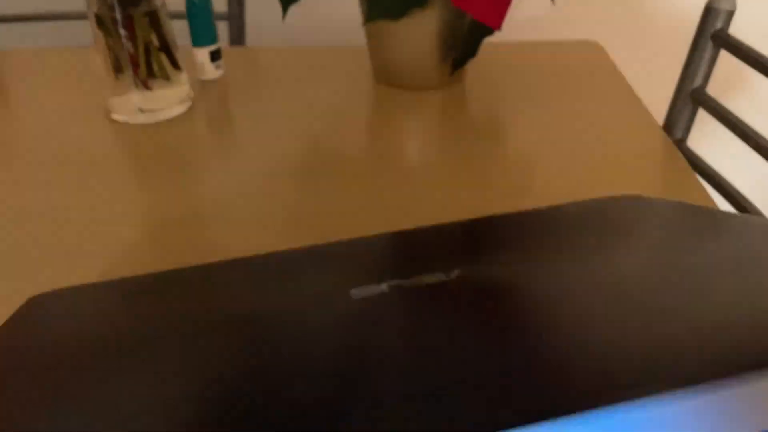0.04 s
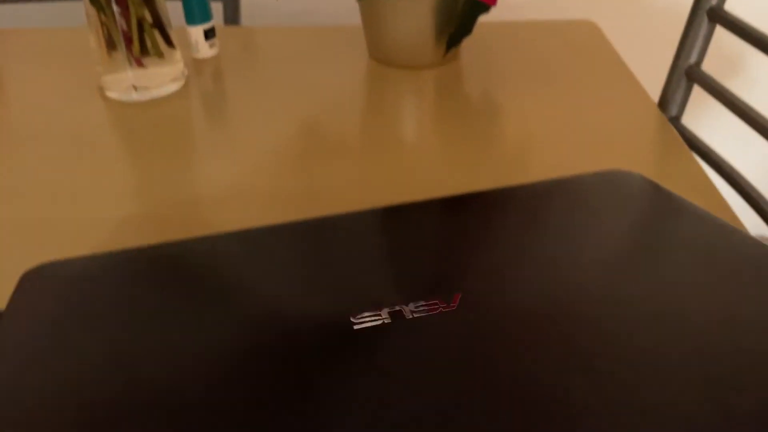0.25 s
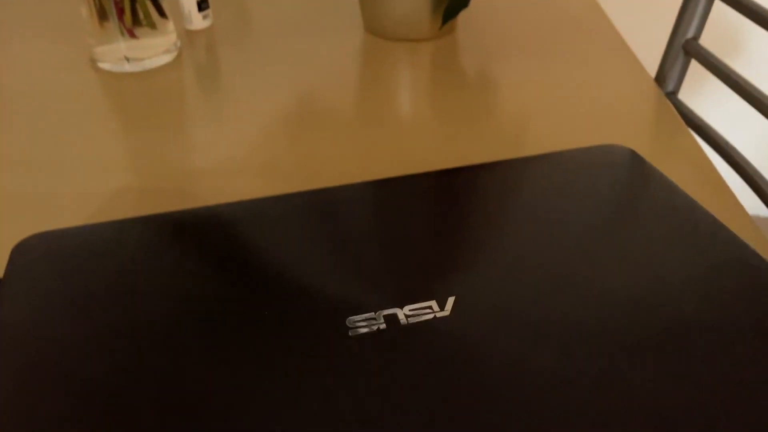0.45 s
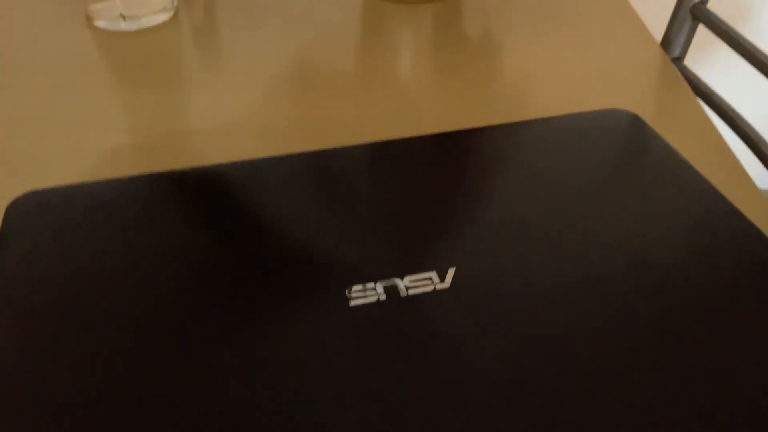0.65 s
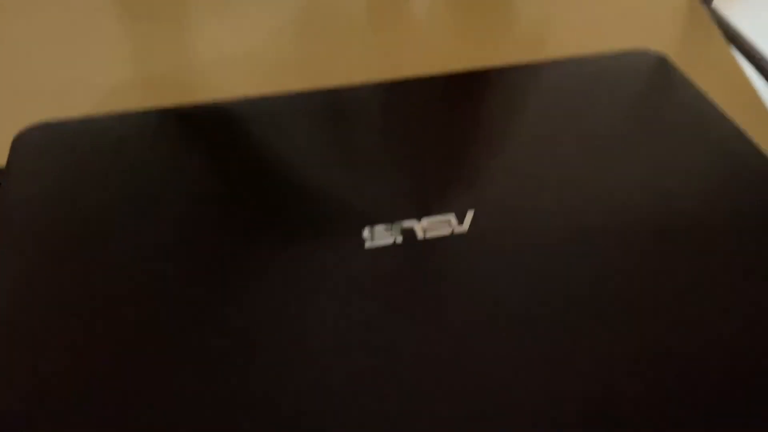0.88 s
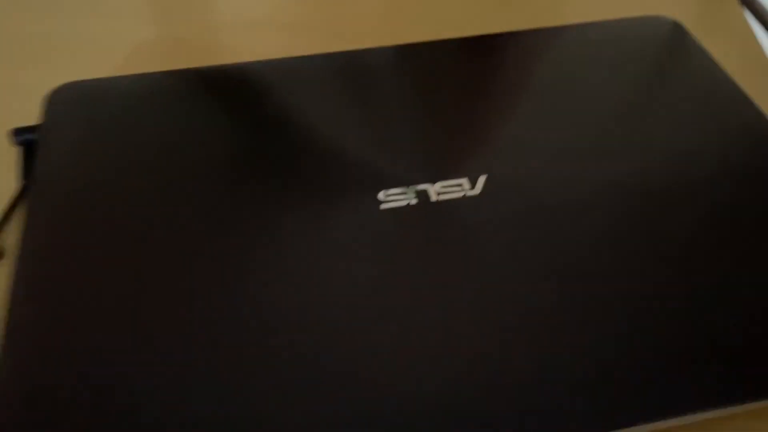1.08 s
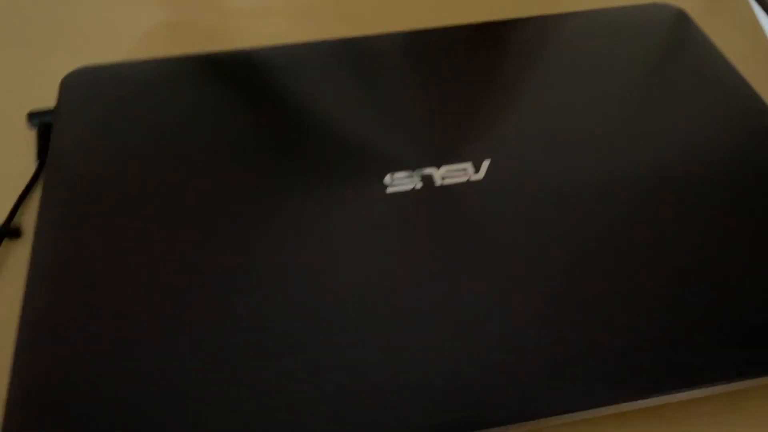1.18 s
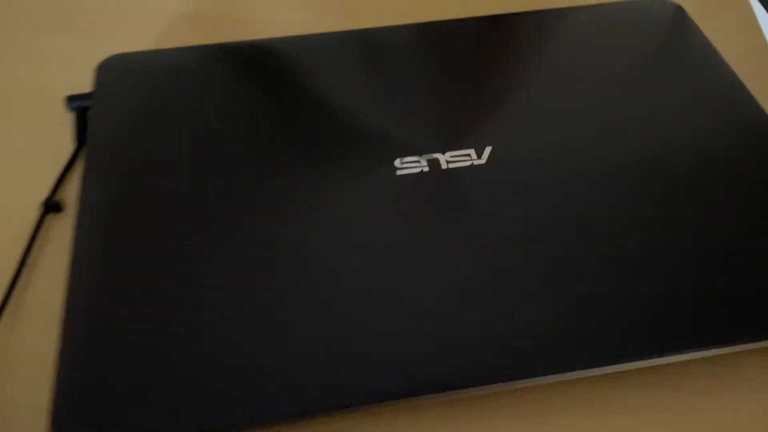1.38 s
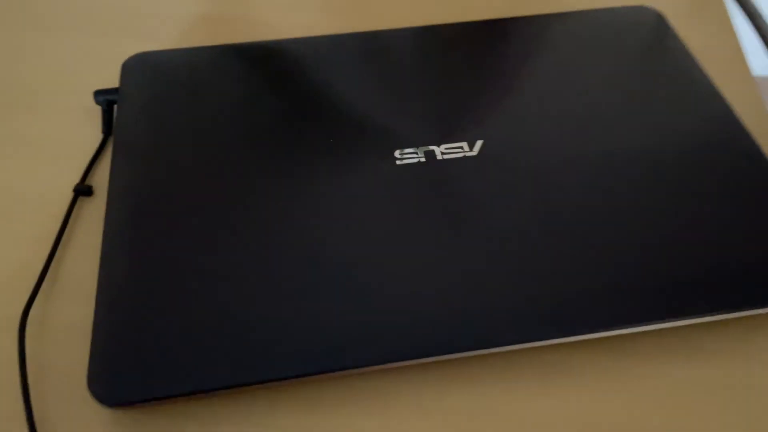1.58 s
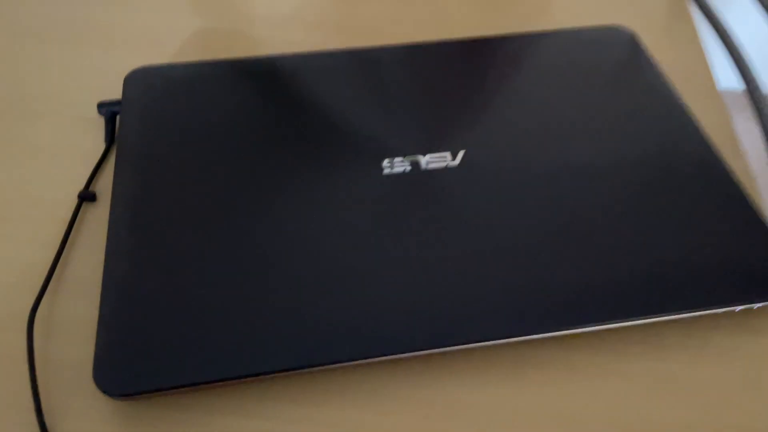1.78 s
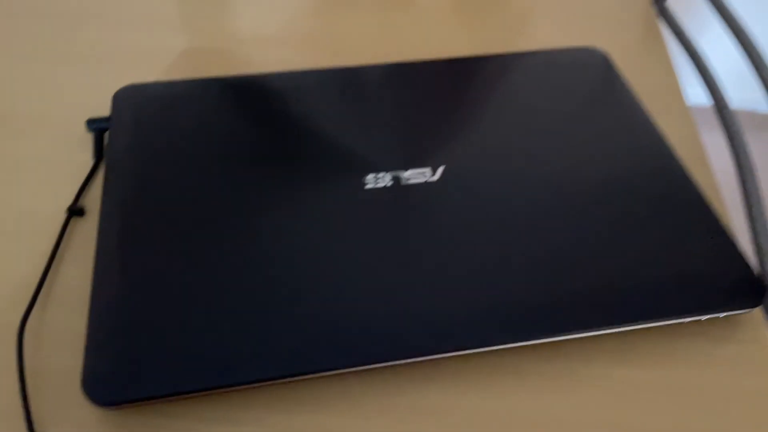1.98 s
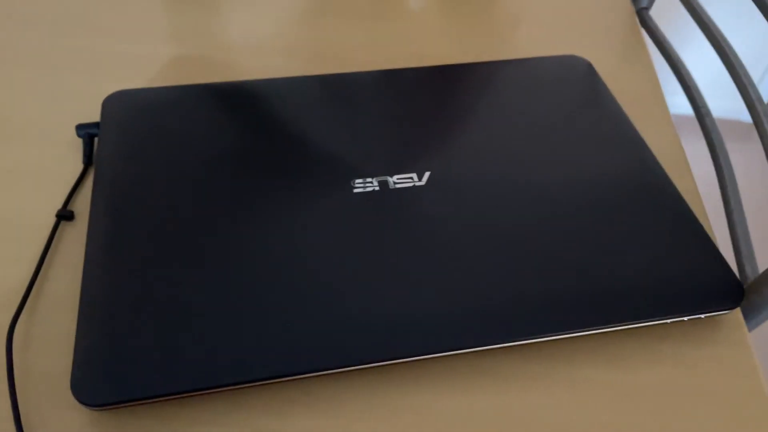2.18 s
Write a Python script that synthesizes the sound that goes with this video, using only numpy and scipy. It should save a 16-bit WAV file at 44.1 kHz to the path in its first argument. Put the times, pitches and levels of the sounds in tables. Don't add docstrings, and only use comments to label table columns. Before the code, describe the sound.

A laptop lid claps shut at about 0.47 seconds: a tiny air puff, a tight cluster of bright plastic clicks heard as one snap, and a dull wooden table thud, fading quickly in a small room. Before it, a faint fan hisses, then becomes muffled. Afterwards, until about 2.2 seconds, a quiet low hum gently swells, strongest near 1.45, with faint cloth and hand rustles close to the microphone.

```python
import sys
import numpy as np
from scipy import signal
from scipy.io import wavfile

SR = 44100
rng = np.random.default_rng(int(sys.argv[2]) if len(sys.argv) > 2 else 0)


def field_ratio(decibels):
    return 10 ** (np.asarray(decibels, dtype=float) / 20)


def store_pcm(level_fs):
    pcm = np.round(np.clip(level_fs, -1, 1) * 32767).astype(np.int16)
    wavfile.write(sys.argv[1], SR, np.atleast_2d(pcm).T)


N = 98475
TIME = np.arange(N) / SR

# [t/s, strength/dB, hardness as cut-off f/Hz, crack level/dB]
CONTACTS = [(0.4673, -44, 3000, -40), (0.4688, -38, 2960, -49.5), (0.4704, -34, 2070, -39.5),
            (0.4731, -28.5, 840, -41.5), (0.4764, -35.5, 2500, -54), (0.4787, -33, 2640, -25.5),
            (.4814, -22.5, 770, -37.5), (0.483, -25.5, 950, -38), (0.4873, -36, 980, -50.5),
            (0.4937, -39.5, 894, -61), (.5005, -39.5, 790, -63), (0.508, -40, 690, -70),
            (.5210, -40, 450, -78), (0.791, -56, 328, -110), (1.172, -63, 603, -120)]
# [f/Hz, side minus mid level/dB]
SIDE_LEVEL = [(60, -14.5), (110, -11), (200, -10.5), (380, -5.5), (700, 0), (1290, -5.5), (2380, -2.5),
              (4400, -2.5), (8120, 8.5), (15000, -7.5)]


def rms_one(x):
    return x / np.sqrt(np.mean(x ** 2) + 1e-20)


def at_hz(points, hz):
    points_hz, points_db = np.transpose(points)
    return np.interp(np.log(hz), np.log(points_hz), points_db)


def left_right(mid, side):
    return np.array([mid + side, mid - side])


def butter(x, order, hz, kind="low"):
    return signal.sosfilt(signal.butter(order, hz, kind, fs=SR, output="sos"), x)


def drift(rate_hz):
    step = 40
    r = np.exp(-2 * np.pi * rate_hz * step / SR)
    white = rng.standard_normal(N // step + 2002)
    slow = rms_one(signal.lfilter([1], [1, -2 * r, r * r], white)[2000:])
    return np.interp(np.arange(N) / step, np.arange(len(slow)), slow)


def bands(size):
    edges = 22 * 2 ** np.arange(0, 9.7, 1 / 3)
    white = rng.standard_normal((2, 2, size + 8000))
    for k, (low, high) in enumerate(zip(edges, edges[1:])):
        mid, side = butter(white[k % 2], 2, [low, high], "band")
        yield np.sqrt(low * high), mid[-size:], side[-size:]


def banded_noise(spectrum, patchy_db):
    out = 0
    for hz, mid, side in bands(N):
        flicker_db = patchy_db * (drift(4.1) + 0.54 * drift(20))
        pair = left_right(mid, side * field_ratio(at_hz(SIDE_LEVEL, hz)))
        out = out + field_ratio(at_hz(spectrum, hz) + flicker_db) * pair
    return out / np.sqrt(np.mean(out.mean(axis=0) ** 2))


def hums():
    # [f/Hz, width/Hz, level/dB]
    tones = [(58.7, 26, -67.5), (162, 6.1, -69), (222, 9.2, -71.5), (301.3, 4.7, -70), (1250, 88, -85),
             (1942, 130, -87.5), (4068, 78, -96)]
    out = 0
    for hz, width_hz, db in tones:
        r = np.exp(-np.pi * width_hz / SR)
        resonance = [1, -2 * r * np.cos(2 * np.pi * hz / SR), r * r]
        white = rng.standard_normal((2, N + SR))
        mid, side = signal.lfilter([1, 0, -1], resonance, white)[:, SR:]
        pair = left_right(rms_one(mid), rms_one(side) * field_ratio(at_hz(SIDE_LEVEL, hz)))
        out = out + field_ratio(db + 3.13 * drift(2.2)) * pair
    return out


def swelling_house():
    # [f/Hz, level per Hz/dB]
    air = [(22, -1), (59, -2), (229, -10), (270, -14.5), (301, -13.5), (363, -15), (1940, -49),
           (10500, -61.5), (16000, -76)]
    # [t/s, level/dB]
    swell = [
        (0, 1.5),
        (.8, 2),
        (1.0, 1.5),
        (1.28, -1),
        (1.45, 4),
        (1.72, -3),
        (1.93, 1),
        (2.08, -1),
        (2.23, 2.5),
    ]
    house = hums() + field_ratio(-58.5) * banded_noise(air, patchy_db=1.58)
    rumble = butter(house, 1, 1300)
    return house + rumble * (field_ratio(np.interp(TIME, *np.transpose(swell))) - 1)


def fan():
    # [f/Hz, level per Hz/dB]
    hiss = [(300, -17.5), (700, -19), (920, -2), (1300, 7), (1600, -11.5), (1900, -20), (5000, -42.5),
            (10000, -47)]
    shut_s, fade_s, covered_db = 0.463, 0.041, -12
    cover_db = np.interp(TIME, [shut_s - fade_s, shut_s], [0, covered_db])
    return field_ratio(-72 + cover_db) * banded_noise(hiss, patchy_db=-0.1)


def puff():
    # [f/Hz, level per Hz/dB]
    rush = [(300, -1), (1800, 11.5), (3500, -23), (5800, 1), (7600, -27), (15000, -38)]
    start_s, end_s, rise_db, silent_db = 0.451, 0.468, 21, -60
    times = [start_s - 0.004, start_s, end_s, end_s + 0.01]
    shape_db = np.interp(TIME, times, [silent_db, -rise_db, 0, silent_db])
    return field_ratio(-45 + shape_db) * (shape_db > -59) * banded_noise(rush, patchy_db=0)


def cracks():
    # [f/Hz, level per Hz/dB]
    crack_colour = [(300, -35.5), (1000, 5.5), (2600, 3.5), (4000, -4), (5800, -6), (7500, -14),
                    (10000, -11.5), (15500, -22)]
    t60_s, gain_db, side_db, slope_db = 0.0057, 12, -4, -1
    noise = rng.standard_normal((2, N))
    shape = np.zeros(N)
    for s, _, _, crack_db in CONTACTS:
        shape += (TIME >= s) * field_ratio(crack_db - 60 * np.clip(TIME - s, 0, 1) / t60_s)
    side = field_ratio(side_db) * noise[1] + field_ratio(slope_db) * np.gradient(noise[0])
    burst = shape * left_right(noise[0], side)
    hz = np.linspace(0, SR / 2, 513)
    colour = signal.minimum_phase(signal.firwin2(255, hz, field_ratio(2 * at_hz(crack_colour, hz + 1)), fs=SR))
    return field_ratio(gain_db) * signal.lfilter(colour, [1], burst)


def soft(clicks, hz):
    r = np.exp(-2 * np.pi * hz / SR)
    return signal.lfilter([(1 - r) ** 2], [1, -2 * r, r * r], clicks)


def strike(s, db, modes, soft_hz, side_db, size=1):
    out = np.zeros((2, N))
    t = TIME[:SR]
    start = int(s * SR)
    chance = rng.standard_normal((len(modes), 2))
    for k, ((hz, mode_db, t60), (strength, turn)) in enumerate(zip(modes, chance)):
        phase = 2 * np.pi * hz * t
        spread_db = 3.5 * strength
        fade = (-1) ** (k // size) * field_ratio(db + mode_db + spread_db - 60 * t / t60)
        ring = left_right(np.sin(phase), field_ratio(side_db) * np.sin(phase + 2 * turn))
        out[:, start:start + SR] += fade * ring
    return soft(out + 1e-18, soft_hz)


def lid():
    # [f/Hz, level/dB, t60/s]
    shell_modes = [(336, -1.5, 0.062), (405, -6.5, 0.025), (440.5, 2, 0.035), (585.4, 0.5, 0.02),
                   (724, -7.5, 0.03), (837, -8.5, 0.052), (1035, 7, 0.04), (1310, -10, 0.045),
                   (1445, 1, 0.026), (1650, -9, 0.021), (1887, -5, 0.0072), (2620, -5.5, 0.0083),
                   (2850, 0.5, 0.013), (3500, 6.5, 0.006)]
    shell = sum(strike(s, db, shell_modes, hard_hz, -12.5, size=3) for s, db, hard_hz, _ in CONTACTS)
    return butter(shell, 2, 245, "high")


def table():
    # [t/s, level/dB]
    thuds = [
        (0.4836, -30.5),
        (.4870, -25.5),
        (0.519, -32),
    ]
    # [f/Hz, level/dB, t60/s]
    table_modes = [(64.5, -15.5, 0.37), (128, 2.5, 0.063), (187.3, 1, 0.044), (301.4, -7.5, 0.15)]
    # [f/Hz, level/dB, t60/s]
    room_modes = [(147.8, -43.5, 0.53), (222.5, -44, 0.26), (332, -47, 0.94), (388, -59, 0.091)]
    side_db = -18.5
    thud = sum(strike(s, db, table_modes, 198, side_db) for s, db in thuds)
    rebound_s = thuds[2][0]
    return thud, strike(rebound_s, 0, room_modes, 400, side_db)


def room(x):
    # [f/Hz, t60/s]
    echo_t60 = [(60, 0.21), (300, 0.4), (1000, 0.26), (4000, 0.21), (12000, 0.27)]
    # [f/Hz, level/dB]
    echo_colour = [(60, -2), (300, -2), (800, -4), (2200, 1), (4000, 2.5), (10000, -3.5), (14000, -7.5)]
    level_db, gap_s, side_db = -9, 0.00087, -4
    size = SR // 2
    t = TIME[:size]
    echo = 0
    for hz, mid, side in bands(size):
        t60 = at_hz(echo_t60, hz)
        fade = field_ratio(at_hz(echo_colour, hz) - 60 * t / t60) / np.sqrt(t60 * SR / 14)
        echo = echo + fade * left_right(mid, field_ratio(side_db) * side)
    echo = echo * np.clip(t / gap_s, 0, 1) ** 2
    return field_ratio(level_db) * signal.fftconvolve(x.mean(axis=0)[None], echo, axes=1)[:, :N]


def rustling(house):
    # [t/s, length/s, level over the room tone/dB]
    rustles = [
        (0.813, 0.055, 2),
        (0.939, 0.026, 3),
        (1.07, 0.095, 2),
        (1.188, 0.061, 5.5),
        (1.264, 0.045, 4),
        (1.377, 0.1, 4),
        (1.535, 0.082, 0.5),
        (1.654, .06, 4),
        (1.891, 0.069, 3),
        (2.11, 0.059, 1),
    ]
    band = butter(house, 1, [546, 5000], "band")
    rustle_db = sum(db * np.exp(-(2 * (TIME - s) / length) ** 2) for s, length, db in rustles)
    return house + band * (field_ratio(-1.5 + rustle_db) - 1)


def scene():
    house = rustling(swelling_house())
    thud, standing = table()
    shut = lid() + thud + cracks()
    return house + fan() + puff() + shut + standing + room(shut)


def dip(x, hz, width_hz, share):
    return x - share * signal.lfilter(*signal.iirpeak(hz, hz / width_hz, fs=SR), x)


def roll_off(x):
    return signal.sosfilt(signal.butter(12, 16380, fs=SR, output="sos"), x)


def record(dry):
    mid = dip((dry[0] + dry[1]) / 2, hz=7350, width_hz=1900, share=0.62)
    side = dip((dry[0] - dry[1]) / 2, hz=10870, width_hz=1000, share=0.81)
    x = butter(left_right(mid, side), 1, 29.4, "high")
    x = signal.sosfilt(signal.cheby2(12, 50, 16450, fs=SR, output="sos"), x)
    return roll_off(x)


dry = scene()
out = record(dry)
store_pcm(out)
```